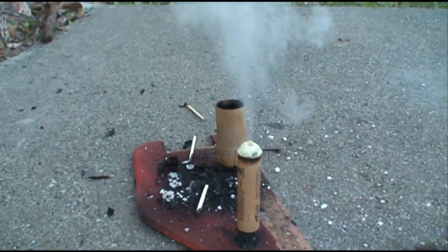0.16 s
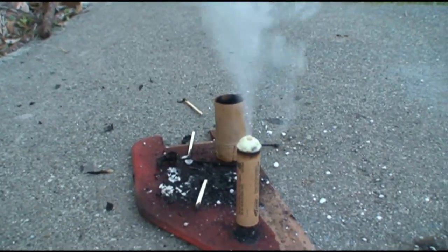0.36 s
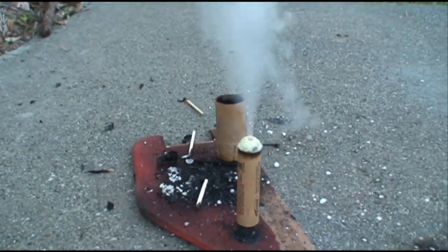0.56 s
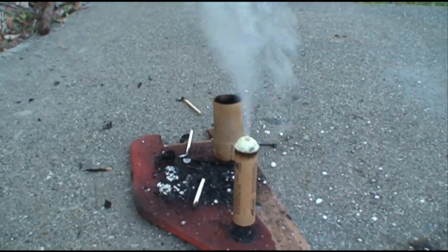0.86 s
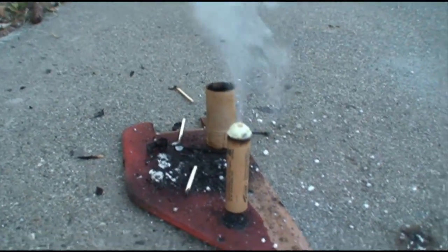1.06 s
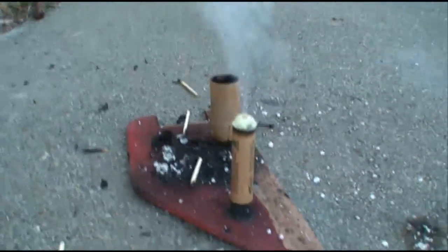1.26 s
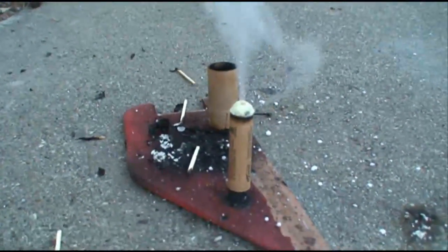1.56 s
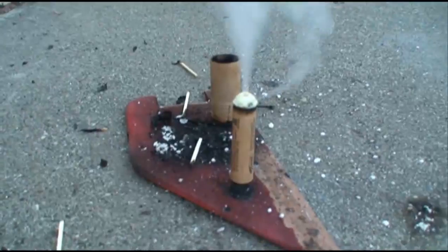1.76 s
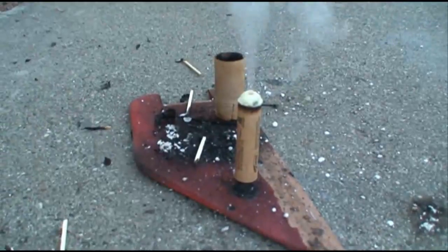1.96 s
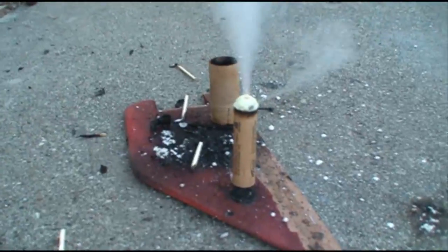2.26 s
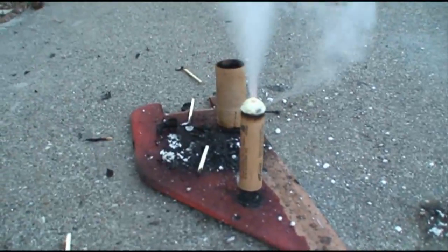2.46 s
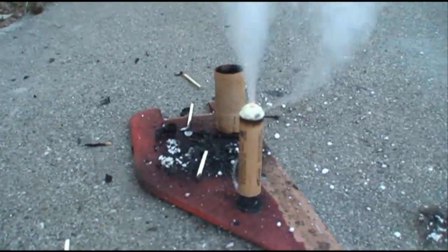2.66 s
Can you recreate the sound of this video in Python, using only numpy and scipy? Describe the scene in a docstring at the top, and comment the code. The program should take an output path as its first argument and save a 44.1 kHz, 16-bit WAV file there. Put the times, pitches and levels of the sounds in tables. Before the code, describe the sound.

A small solid-fuel motor burns close by on outdoor pavement: a harsh, bright gas hiss starts weak, jumps up, sputters unevenly, dips midway, then surges stronger; faint low rumble behind, hand-held camera microphone.

```python
"""A small solid-fuel motor burns on pavement a step from a hand-held camera, over a low outdoor rumble
lying mostly on the right port and a faint steady hiss. The gas jet, filtered noise with a broad resonance
near 3 kHz, starts weak, swells within 0.2 s and sputters; its deepest dip comes near 1.2 s, its strongest
swell near 2.4 s, and it then eases until the end at 2.8 s. All along, the ground returns it 3 ms later."""
import sys
import numpy as np
from scipy import signal
from scipy.fft import rfft, irfft
from scipy.io import wavfile
from scipy.ndimage import uniform_filter1d

SR = 44100
rng = np.random.default_rng(int(sys.argv[2]) if len(sys.argv) > 2 else 0)


def materialize(psi):
    """Save the field psi as 16-bit PCM at rate SR to the path in sys.argv[1].

    A 1-D psi becomes a single channel; in a 2-D psi each row is a channel.
    """
    bounded = np.clip(np.atleast_2d(psi).T, -1, 1)
    quanta = np.round(bounded * 32767).astype(np.int16)
    wavfile.write(sys.argv[1], SR, quanta)


N = 123479  # samples

# Spectral density of the outdoor rumble: f/Hz, relative density/dB (per Hz)
RUMBLE_SPECTRUM = [(13, -41), (22, -14), (70, 1), (128, -3.5), (166, -11.5), (200, -12), (260, -39),
                   (440, -120)]
# Spectral density of the steady outdoor hiss: f/Hz, relative density/dB (per Hz)
AIR_SPECTRUM = [(150, -4), (400, 0), (1200, -5), (3000, -8), (8000, -18), (15000, -26)]
# Strength of the burn: t/s, level/dB, treble above the last band edge relative to that level/dB
BURN_COURSE = [(0.0, -28, -3), (0.15, -20.5, -5.5), (0.25, -29, -4.5), (0.27, -22.5, -4), (0.32, -32, -4),
               (0.35, -24, -4.5), (0.47, -24, -3), (0.47, -18, -7.5), (0.51, -24.5, -3), (0.57, -19, -6.5),
               (0.71, -22, -4), (0.76, -22, -5.5), (0.83, -28.5, -4), (0.92, -24, -2.5),
               (0.97, -28.5, -2.5), (1.02, -21, -5.5), (1.11, -29.5, -1.5), (1.19, -23, -5),
               (1.23, -34.5, -1.5), (1.26, -23.5, -4), (1.31, -30.5, -1), (1.38, -20.5, -4.5),
               (1.54, -19.5, -5.5), (1.57, -17.5, -6), (1.6, -23.5, -6), (1.73, -21.5, -3),
               (1.85, -19.5, -6.5), (1.87, -24.5, -3.5), (1.92, -27, -0.5), (1.97, -19, -7),
               (1.99, -30, -2), (2.1, -27.5, -2.5), (2.18, -17.5, -5), (2.23, -21, -6), (2.24, -18, -7.5),
               (2.34, -18, -2.5), (2.42, -16, -4), (2.79, -20.5, -4.5), (2.8, -23, -3)]
# Spectral density of the jet at the right port: f/Hz, relative density/dB (per Hz)
JET_SPECTRUM = [(120, -31), (190, -21.5), (320, -16), (960, -17), (1080, -22), (1270, -19), (1430, -24.5),
                (1570, -18), (1730, -15), (2230, -4.5), (2980, 1), (3500, -3.5), (4230, -12.5), (5130, -16),
                (8020, -17.5), (9200, -15), (10100, -10), (11600, -14), (12500, -13), (13500, -19),
                (15500, -27.5)]
# Edges between the four jet bands: f/Hz
BAND_EDGES = [700, 1600, 4300]
# How far each band below the treble follows the burn, low to high: slope/(dB per dB)
BAND_FOLLOW = [0.89, 0.81, 0.91]
# Delayed arrivals: delay/ms, signed share of the direct pressure/1
ECHO_PATHS = [(3.09, 0.2), (3.1, -0.033), (0.767, -0.036)]
# Left port relative to the right: f/Hz, level/dB, likeness/1 (0 to 1), phase lead/rad
PORT_RELATION = [(60, -21, .78, 2), (130, -19, 0.5, 1.5), (220, -10.5, 0.4, 0.9), (400, -8.5, .6, 0.86),
                 (650, -6, .8, .5), (1200, -4.5, .78, .3), (1430, -3.5, .5, .1), (1900, -5.5, .92, 0.01),
                 (2880, -5.5, 0.98, -0.23), (4200, -4, .82, -0.3), (5040, -0.8, .96, -0.07),
                 (7200, 0.2, 0.96, -0.2), (8000, -1.7, .995, 0.2), (8800, -2.5, 0.9, 0.15),
                 (9540, -1.5, .8, 0), (11000, -5, 0.7, -0.2), (12500, -6.5, 0.7, -1.2), (13600, -5, .7, 1),
                 (14100, -0.5, 0.97, 0.1)]

RUMBLE_DB, AIR_DB = -38.5, -49.5  # rms level/dB
BURN_MEAN_DB, TREBLE_MEAN_DB = -20.5, -4.5  # reference points of the burn course
JET_DB = 3  # jet level above the burn reference, before modulation
SPUTTER_HZ, SPUTTER_DB = 27.8, 0.5  # shared by the bands, scaled by how far each follows the burn
FLICKER_HZ, FLICKER_DB = 7.5, 0.73  # drawn for each band alone
GRAIN_HZ, GRAIN_DB = 453, 0.99  # bursts of a few cycles
TOP_HZ = 15680  # passband edge of the camera


def undb(db):
    """Amplitude ratio from decibels, by the 20 log10 law."""
    return 10 ** (np.asarray(db) / 20)


def level(x, db):
    """Root-mean-square scaling: the mean power over all strands is set."""
    return x * undb(db) / np.sqrt(np.mean(x ** 2))


def bin_frequencies():
    """Discrete Fourier principle: the bins lie at multiples of SR / N."""
    return np.arange(N // 2 + 1) * SR / N


def over_hz(table, column=1):
    """Linear interpolation of a table column along a logarithmic frequency axis."""
    table = np.array(table)
    hz = np.maximum(bin_frequencies(), 1)
    return np.interp(np.log(hz), np.log(table[:, 0]), table[:, column])


def colour(x, gain):
    """Linear filtering: each spectral component is multiplied by its gain."""
    return irfft(rfft(x) * gain, N)


def coloured_noise(spectrum):
    """Spectral shaping of two unrelated strands of white noise."""
    return colour(rng.standard_normal((2, N)), undb(over_hz(spectrum)))


def walk(hz):
    """Random modulation: white noise averaged twice over 1/hz seconds, at unit standard deviation."""
    width = int(SR / hz)
    smooth = uniform_filter1d(rng.standard_normal(N), width)
    smooth = uniform_filter1d(smooth, width)
    return smooth / smooth.std()


def rumble():
    """Stationary random noise with its energy at low frequencies: the outdoor rumble."""
    return level(coloured_noise(RUMBLE_SPECTRUM), RUMBLE_DB)


def air():
    """Stationary broadband noise: the faint hiss of the surroundings."""
    return level(coloured_noise(AIR_SPECTRUM), AIR_DB)


def ground(x):
    """Superposition of direct and delayed sound; a delay is a phase proportional to frequency."""
    hz = bin_frequencies()
    transfer = 1
    for delay_ms, share in ECHO_PATHS:
        transfer = transfer + share * np.exp(-2j * np.pi * hz * delay_ms / 1000)
    return colour(x, transfer)


def jet():
    """Turbulent jet noise in short bursts, modulated by band; two unrelated strands share every swell."""
    t = np.arange(N) / SR
    times, burn_db, treble_db = np.array(BURN_COURSE).T
    swell_db = np.interp(t, times, burn_db) - BURN_MEAN_DB + SPUTTER_DB * walk(SPUTTER_HZ)
    treble_swell_db = swell_db + np.interp(t, times, treble_db) - TREBLE_MEAN_DB
    bands_db = [slope * swell_db for slope in BAND_FOLLOW] + [treble_swell_db]

    gas = level(coloured_noise(JET_SPECTRUM), BURN_MEAN_DB + JET_DB)
    gas_spectrum = rfft(gas * undb(GRAIN_DB * walk(GRAIN_HZ)))
    band_of_bin = np.searchsorted(BAND_EDGES, bin_frequencies())
    total = np.zeros((2, N))
    for k, band_db in enumerate(bands_db):
        band = irfft(gas_spectrum * (band_of_bin == k), N)
        total += band * undb(band_db + FLICKER_DB * walk(FLICKER_HZ))
    return total


def scene():
    """Partial coherence: the right port hears one strand, the left a filtered blend of both."""
    right, other = ground(jet()) + air() + rumble()
    gain = undb(over_hz(PORT_RELATION))
    alike = np.clip(over_hz(PORT_RELATION, column=2), 0, 1)
    lead = np.exp(1j * over_hz(PORT_RELATION, column=3))
    shared = colour(right, gain * alike * lead)
    unrelated = colour(other, gain * np.sqrt(1 - alike ** 2))  # powers of the two parts add up
    return np.array([shared + unrelated, right])


def record(dry):
    """Band limitation: the camera cuts the top with a steep elliptic low-pass."""
    lowpass = signal.ellip(16, 0.3, 70, TOP_HZ, fs=SR, output="sos")  # ripple/dB, stopband/dB
    return signal.sosfilt(lowpass, dry)


dry = scene()
out = record(dry)
materialize(out)
```